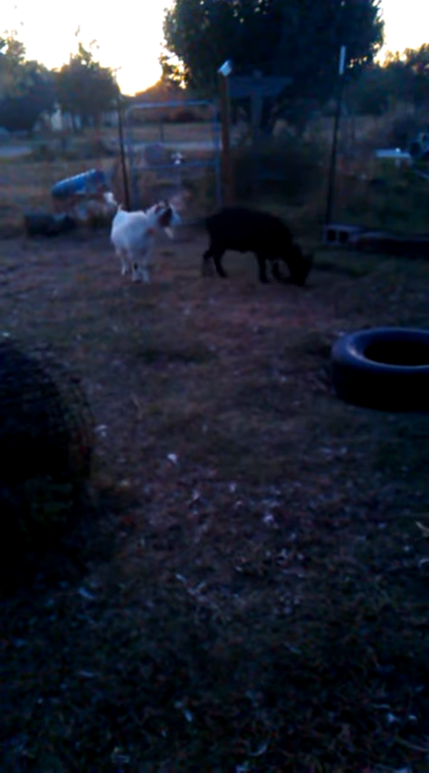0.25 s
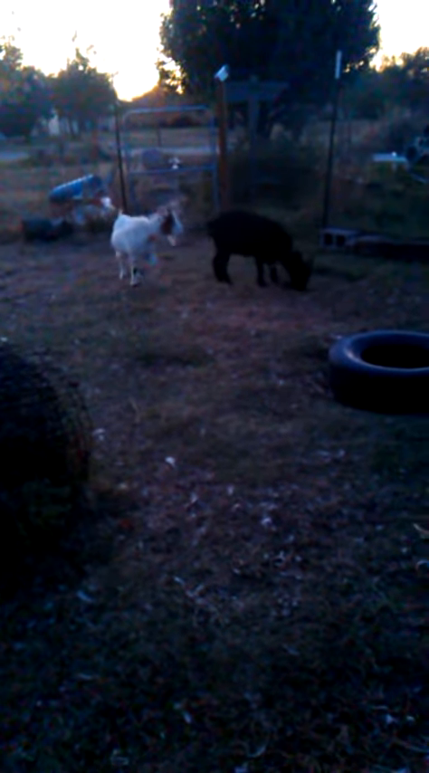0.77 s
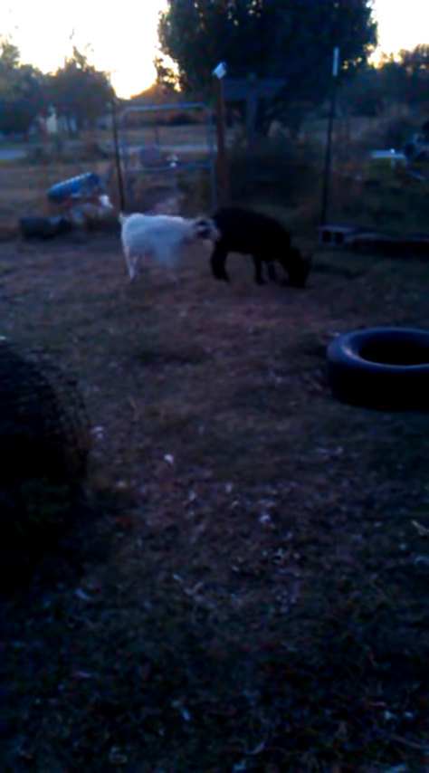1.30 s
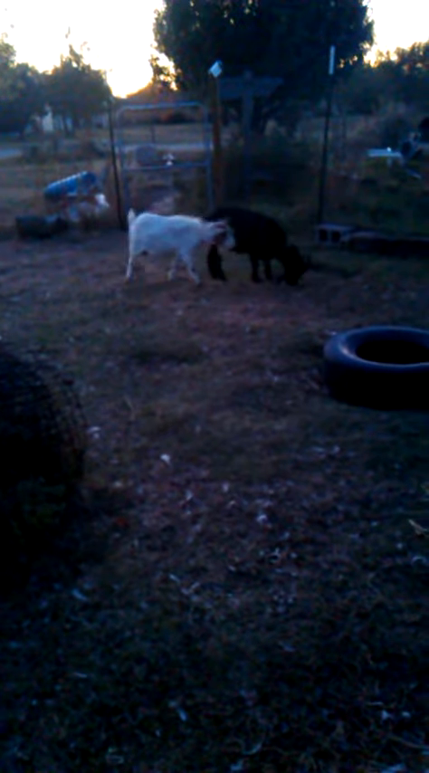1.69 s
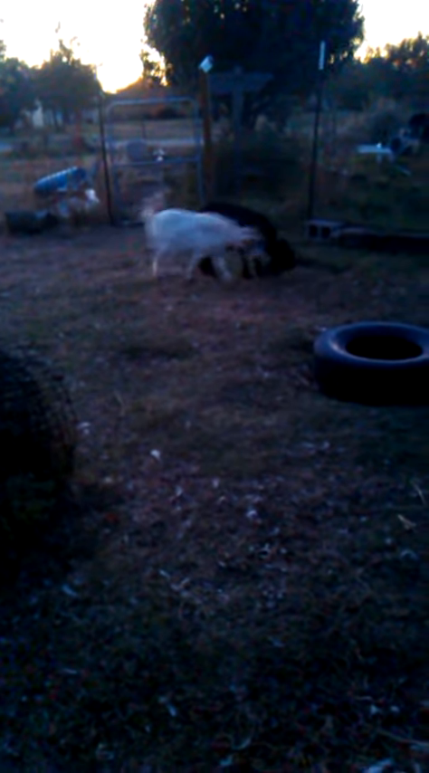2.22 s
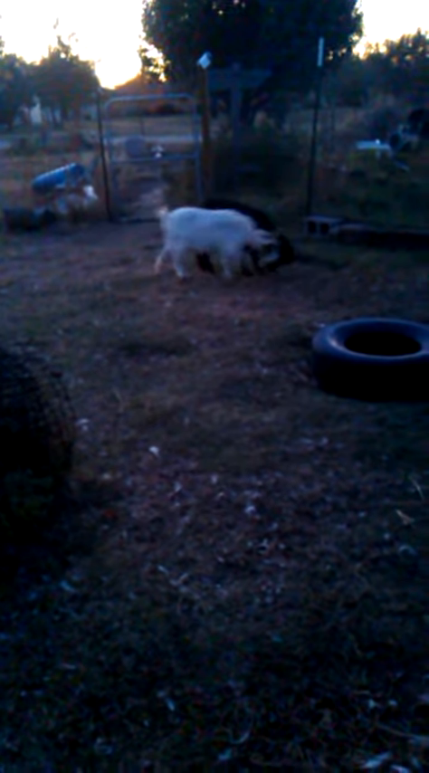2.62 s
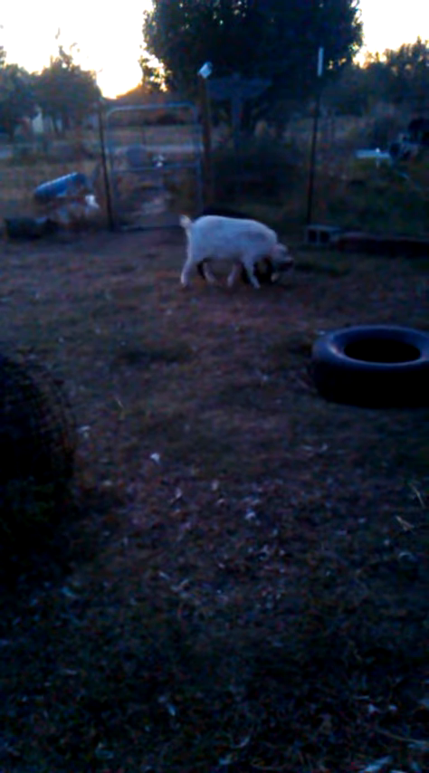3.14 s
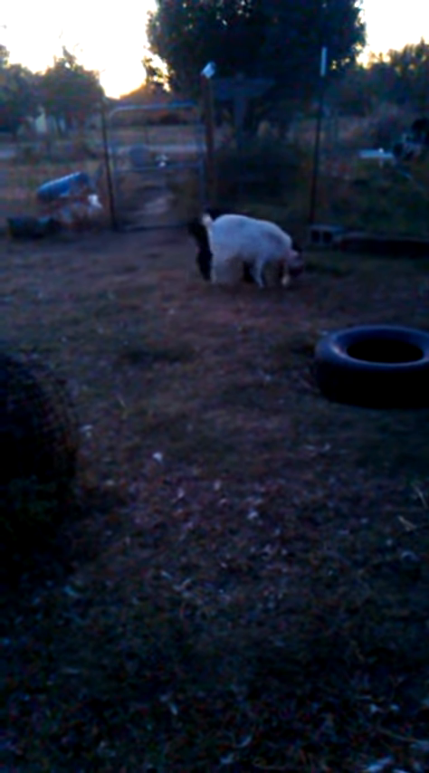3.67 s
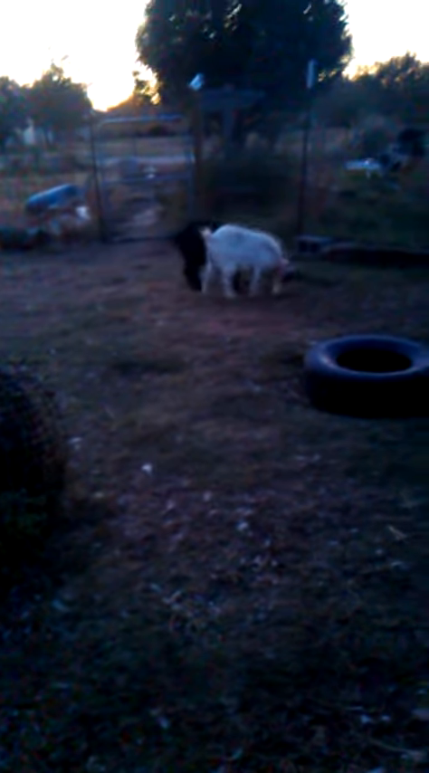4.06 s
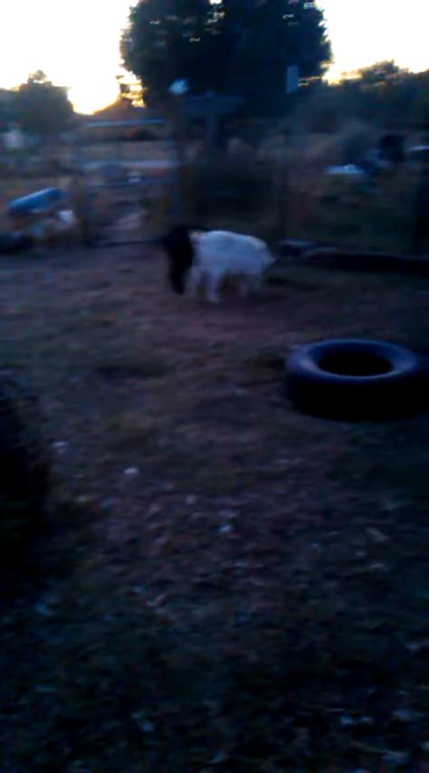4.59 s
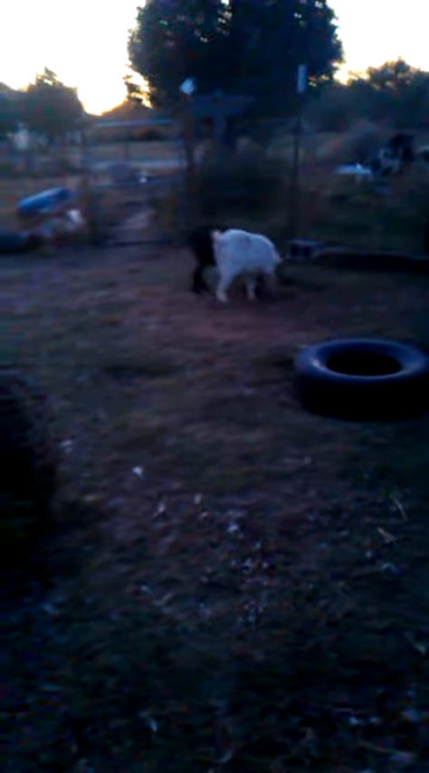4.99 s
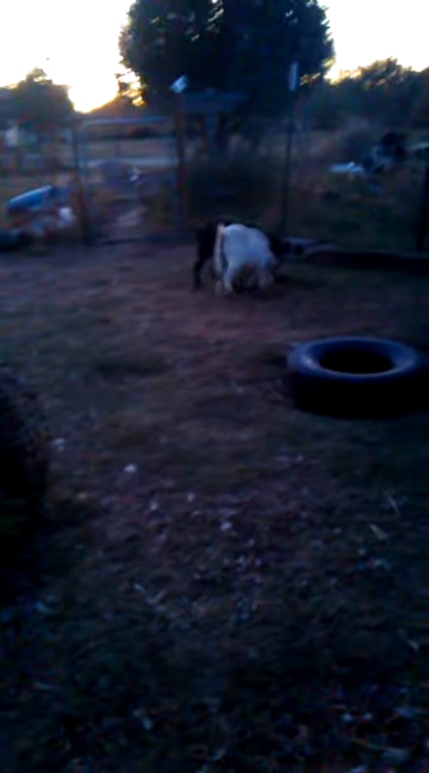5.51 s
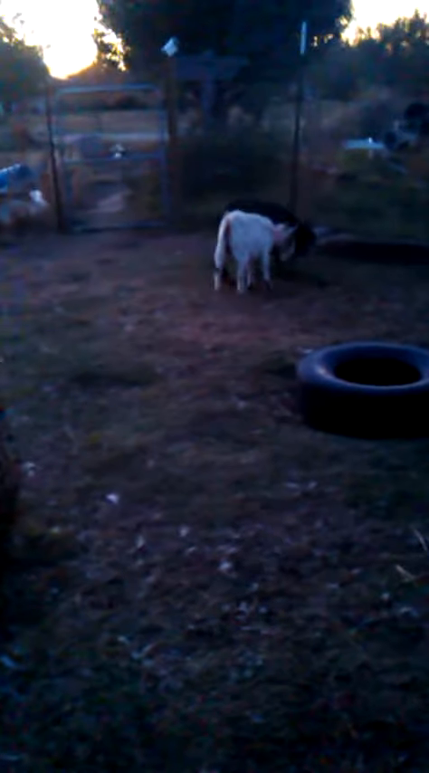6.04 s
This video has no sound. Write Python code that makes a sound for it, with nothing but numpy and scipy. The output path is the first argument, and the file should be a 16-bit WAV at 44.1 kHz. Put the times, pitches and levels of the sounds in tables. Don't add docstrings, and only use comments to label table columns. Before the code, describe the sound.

A hushed outdoor bed of wavering low hum and thin grass hiss carries muffled, far-off fowl clucks, dry clicks and an occasional tiny bird chip. Midway a goat breaks in with short, raspy, nasal bleats that crack and go hoarse, ending on a clean cry cut off abruptly. Its ringing fades across the open yard; afterwards there is a sharp tick, hoof thuds, rustled leaves and more low clucking, heard by a handheld microphone.

```python
import sys
import numpy as np
from scipy import signal
from scipy.io import wavfile
from scipy.ndimage import uniform_filter1d

SR = 44100
rng = np.random.default_rng(int(sys.argv[2]) if len(sys.argv) > 2 else 0)


def put_to_file(sound):
    columns = np.atleast_2d(sound).T
    safe = np.clip(columns, -1, 1)
    whole_steps = np.round(safe * 32767)
    wavfile.write(sys.argv[1], SR, whole_steps.astype(np.int16))


def to_linear_factor(level_db):
    exponent = np.asarray(level_db, float) / 20
    return 10 ** exponent


N = 277389

# time in seconds, level in
# dB.
HUM_SWELL = [(0, -59), (.4, -68), (.56, -57), (.9, -51), (1.5, -58), (1.9, -66), (2.55, -63.5),
             (2.75, -57.5), (3.8, -59.5), (4.0, -70.5), (4.3, -76), (4.6, -61.5), (5.4, -60), (5.7, -59),
             (5.9, -63), (6.29, -57.5)]
# starting level in dB, drift in dB per second, share of the swell.
HUM_PARTIALS = [(-16, 2.5, 0.53), (-1, 0, 0.81), (-12.5, 1.5, 0.81)]
# frequency in Hz, level in dB.
RUMBLE = [(27, -69.5), (50, -75)]
# frequency in Hz, density in dB per Hz.
AIR_COLOUR = [(12, -37), (20, -6), (93, -23), (226, -14.5), (283, -9.5), (363, -17), (418, -19),
              (467, -14.5), (1880, -32), (2780, -32.5), (5280, -31.5), (7800, -36), (15700, -36)]
# frequency in Hz, density in dB per Hz.
GRASS_COLOUR = [(500, -1), (1200, -1), (2300, -7), (3500, -18), (4600, 0), (5500, 3.5), (6500, -3.5),
                (8000, -21), (12000, -37)]
# centre in seconds, level in dB, width in seconds.
GUSTS = [(0, -57.5, 0.036), (.15, -62.5, 0.2), (1.46, -54, 0.093), (2.3, -65.5, 0.21), (4.7, -62.5, 0.11),
         (5.774, -57, 0.13), (6.29, -61, 0.11)]

# start in seconds, level in dB, start pitch in Hz, top pitch in Hz.
CHIPS = [
    (1.109, -45.5, 5110, 6010),
    (2.727, -45.5, 5150, 6000),
    (5.219, -42.5, 4960, 6140),
]
# start in seconds, level in dB, length in seconds, cavity pitch factor.
OPEN_CLUCKS = [(0.16, -49, 0.073, 0.94), (0.505, -50.5, 0.19, 0.87), (0.559, -48, 0.042, 1.01),
               (0.956, -46.5, 0.082, 0.95), (1.154, -46.5, 0.087, 0.95), (1.566, -45.5, 0.077, 0.98),
               (1.812, -46, 0.092, 0.99), (2.347, -50.5, 0.091, 0.99), (2.728, -52.5, 0.13, 0.92),
               (2.163, -56.5, 0.034, 0.91), (5.58, -52, 0.078, 0.9)]
# start in seconds, level in dB, length in seconds, cavity pitch factor.
MUTTERS = [(0.25, -54, 0.058, 0.67), (0.682, -51, 0.036, 0.87), (.745, -53, 0.071, 1),
           (1.266, -49, 0.049, 0.73), (1.431, -46, 0.058, 1.28), (2.086, -48.5, .058, 0.93),
           (2.802, -50.5, 0.1, 0.94), (4.7447, -51, 0.059, 1.2), (4.95, -44, 0.11, 1.03),
           (5.223, -49.5, 0.091, 0.89), (5.2925, -46.5, 0.093, 0.89), (5.684, -57, 0.078, 1.15),
           (5.938, -45.5, 0.13, 0.966), (6.019, -46, 0.082, 0.87), (6.12, -44, 0.47, 0.97),
           (6.2527, -61, 0.085, 0.97), (6.0144, -51, 0.023, 1.8), (6.205, -42.5, 0.06, 1.64)]
# upper rings in dB, brightness in dB, air between knocks as a ratio.
OPEN_BEAK = (5.1, -6, 1.1)
SHUT_BEAK = (-5.5, -12.5, 0.54)
# frequency in Hz, width in Hz, level in dB.
CLUCK_RINGS = [(1282, 250, 11.5), (1545, 71, 14.5), (1946, 165, 1), (2453, 106, -10.5)]

# start in seconds, level in dB, ring in Hz, t60 in seconds.
TICKS = [(0.19, -41.5, 5400, 0.0066), (0.9462, -51, 4020, 0.0043), (1.141, -46, 5900, 0.004),
         (1.1534, -47, 5900, 0.004), (1.7624, -52, 3260, 0.0052), (2.0403, -53, 4100, 0.0072),
         (2.3846, -39, 4450, 0.013), (2.587, -42.5, 5390, 0.0025), (2.712, -52, 3400, .004),
         (2.8584, -46, 3080, 0.005), (2.859, -50, 4100, .004), (2.9317, -38, 6200, 0.00195),
         (4.6844, -41, 4960, 0.008), (4.695, -50, 4500, .006), (1.788, -50, 5000, .004),
         (4.7156, -41, 3845, 0.0044), (5.1178, -30.5, 5500, 0.0034), (5.467, -48, 5320, 0.00335),
         (5.977, -51, 4900, 0.0054), (6.0482, -51, 5490, 0.012)]
# start in seconds, level in dB, ring in Hz, t60 in seconds.
THUDS = [
    (2.859, -51, 278, 0.064),
    (3.669, -41.5, 260, 0.038),
    (4.38, -50, 155, 0.087),
    (5.128, -44, 272, 0.14),
    (0.031, -55, 792, 0.2),
    (5.062, -47.5, 604, 0.049),
]
# start in seconds, level in dB, centre in Hz, width in Hz, t60 in seconds.
SCUFFS = [(0.89, -62, 5100, 2500, 0.1), (1.8364, -67, 4960, 2500, 0.32), (2.2, -54.5, 4200, 1900, 0.25),
          (4.955, -56.5, 1800, 1500, .3), (4.9675, -53.5, 4100, 2900, 0.29),
          (6.1705, -53.5, 5500, 2450, 0.33), (6.174, -56, 5200, 350, .15), (6.05, -60, 5500, 500, .1),
          (4.68, -58, 5400, 2500, 0.11), (2.1, -57, 2450, 150, .3)]

# time in seconds, effort in dB, mouth opening 0-1.
BLEATS = [
    [(2.985, -44, 0.5), (2.991, -35, 0.65), (3.007, -27.5, 0.7), (3.045, -22.5, 0.52), (3.055, -24, 0.6),
     (3.12, -24, 0.63), (3.189, -34.5, 0.81), (3.21, -50, 0.06)],
    [(3.286, -33, 0.38), (3.312, -22.5, 0.3), (3.352, -24.5, 0.3), (3.364, -21.5, 0.52), (3.39, -25, 0.37),
     (3.41, -33.5, 0.1), (3.44, -40.5, 0), (3.455, -49, 0)],
    [(3.455, -42.5, 0.5), (3.489, -22.5, 0.7), (3.541, -22, 0.75), (3.67, -23, 0.56), (3.791, -27, 0.7),
     (3.83, -41.5, 0.82)],
    [(3.974, -38, 0.57), (3.982, -34.5, 0.84), (4.022, -26.5, 0.65), (4.1, -25.5, 0.5), (4.19, -26, 0.64),
     (4.29, -30.5, 0.53)],
]
# time in seconds, pitch in Hz, roughness 0-1.
FOLDS = [
    [(2.985, 468, .2), (3.006, 514, .1), (3.02, 530, .08), (3.04, 552, .12), (3.05, 580, .76),
     (3.108, 598, .76), (3.124, 540, .6), (3.134, 531, .08), (3.168, 516, .12), (3.182, 512, .7),
     (3.22, 520, .5)],
    [(3.285, 545, .8), (3.302, 650, .7), (3.311, 688, .13), (3.321, 702, .14), (3.33, 740, .18),
     (3.35, 752, .24), (3.359, 712, .1), (3.378, 698, .1), (3.388, 675, .35), (3.394, 705, .85),
     (3.415, 708, .3), (3.44, 745, .4), (3.455, 735, .6)],
    [(3.455, 710, .65), (3.47, 690, .8), (3.5, 668, .7), (3.7, 668, .66), (3.84, 655, .75)],
    [(3.97, 565, .8), (4.025, 590, .72), (4.05, 592, .65), (4.11, 584, .65), (4.165, 600, .68),
     (4.19, 650, .7), (4.29, 647, .55)],
]
# frequency in Hz, width in Hz, level in dB.
HALF_OPEN_THROAT = [(634, 660, 0), (970, 174, -2.5), (1370, 122, 10), (2070, 250, -19), (2994, 235, -14),
                    (4140, 205, -6), (4634, 330, 1), (5500, 410, -11.5), (6270, 270, -6.5),
                    (8650, 400, -35), (9730, 230, -24), (11130, 400, -38.5), (13050, 530, -39)]
WIDE_OPEN_THROAT = [(530, 280, -10), (1016, 130, 1), (1380, 360, 1), (1890, 180, -9.5), (2800, 300, -17.5),
                    (4260, 740, -9.5), (4730, 320, 2), (5560, 620, 7), (6200, 120, -10), (7700, 750, -22),
                    (10400, 1020, -42), (10580, 140, -21)]
HOARSE_THROAT = [(660, 1300, -8), (995, 130, -0.5), (1335, 168, 0.5), (1793, 337, -10), (2860, 150, -14),
                 (3204, 130, -17), (4190, 730, -13), (4880, 330, -1), (5650, 450, 4.5), (6200, 300, -12),
                 (6850, 160, -50), (8340, 504, -27), (8830, 350, -27), (10920, 660, -33)]
STRAINED_THROAT = [(500, 370, -23), (1004, 235, -2.5), (1317, 118, 4), (1730, 265, -9.5), (2715, 260, -21),
                   (3950, 380, -5.5), (4610, 350, -2.5), (5590, 375, 1.5), (6420, 150, -13),
                   (8070, 560, -24.5), (9880, 330, -25.5), (10934, 450, -32)]
# frequency in Hz, width in Hz, opening 0-1.
POCKETS = [(3530, 560, 0.94), (3630, 240, 0.8), (3800, 190, .8), (3500, 400, 0.9)]
SPLITS_HZ = [0, 0, 55, 0]
LIPS_DB = [17, 1.8, 1.1, 1]
NOSES_DB = [2.5, -4, -0.5, 1.3]
# time in seconds, dip in dB.
CATCHES = [(3.06, -11), (3.08, -15), (3.115, -21), (3.318, -17), (3.383, -14), (3.4, -8), (3.447, -15),
           (4.194, -8)]
HANDOVER_S = (4.222, 4.266)
# time in seconds, pitch in Hz, level in dB, mouth opening 0-1.
CRY = [(4.22, 637, -25.5, 1), (4.278, 643.8, -27.5, 0.88), (4.38, 638.4, -26.5, 0.76),
       (4.464, 629, -28.5, 0.92), (4.5, 627.4, -26, 0.65), (4.565, 619.7, -28, 0.24),
       (4.588, 608, -25.5, 0.04), (4.596, 580, -26.5, 0.02), (4.607, 475, -41, 0)]
# multiple of the pitch, level in dB, drift in dB per second.
CRY_PARTIALS = [(1, -6, 0), (2, 0, 0), (3, -28, -20), (4, -34, -50), (5, -37, 12), (6, -15, 25),
                (7, -9, -20), (8, -16, -20), (9, -21, -10), (10, -11, -15), (11, -29, -50), (12, -36, 40),
                (13, -41, 20), (14, -42, 20), (15, -33, -55), (16, -37, 40), (17, -35, -40), (18, -47, 50),
                (19, -46, 90)]

# frequency in Hz, t60 in seconds.
YARD_T60 = [(400, 0.29), (650, 0.64), (1250, 0.86), (2500, 0.85), (4000, 0.54), (8000, 0.058)]
# delay in seconds, level in dB.
ECHOES = [(.004, -20), (.021, -16), (.058, -23), (.095, -20), (.16, -58), (.235, -51), (.3, -36.5)]
# frequency in Hz, threshold in dB.
DROPOUT = [(1500, -72), (2200, -57), (3000, -55.5), (3600, -54), (4500, -68), (8000, -66), (11000, -62),
           (14000, -60)]


def evened(x):
    return x / np.sqrt(np.mean(x ** 2) + 1e-20)


def steadied(x, span_s=0.1):
    return x / np.sqrt(abs(uniform_filter1d(x ** 2, int(span_s * SR))) + 1e-12)


def read(points, hz):
    f, value = np.transpose(points)
    return np.interp(np.log(hz + 1), np.log(f + 1), value)


def unroll(rows):
    s, *columns = np.transpose(rows)
    t = np.arange(s[0], s[-1], 1 / SR)
    return t, [np.interp(t, s, c) for c in columns]


def add(mix, start_s, sound):
    part = mix[round(start_s * SR):][:len(sound)]
    part += sound[:len(part)]


def resonate(x, hz, width_hz):
    turn = np.exp(2j * np.pi * hz * np.arange(len(x)) / SR)
    r = np.exp(-np.pi * abs(width_hz) / SR)
    return 2 * (turn * signal.lfilter([1 - r], [1, -r], x / turn)).real


def resonate_twice(x, hz, width_hz):
    return resonate(resonate(x, hz, width_hz), hz, width_hz)


def wobble(length, hz):
    low_pass = signal.butter(2, hz, fs=SR, output="sos")
    return evened(signal.sosfilt(low_pass, rng.standard_normal(length)))


def hiss(colour, patchy_db):
    hz = np.fft.rfftfreq(1024, 1 / SR)
    a, b, patches = rng.standard_normal((N // 256 + 5, 513, 3)).T
    patches = uniform_filter1d(patches, size=12, axis=0)
    patches = evened(uniform_filter1d(patches, size=10, axis=1))
    spectrum = (a + 1j * b) * to_linear_factor(read(colour, hz)[:, None] + patchy_db * patches)
    return evened(signal.istft(spectrum, nperseg=1024, noverlap=768)[1][:N])


def air():
    return to_linear_factor(-60) * hiss(AIR_COLOUR, patchy_db=.4)


def hum():
    t, (swell_db,) = unroll(HUM_SWELL)
    hz = 142.1 - .8 * t
    turns = np.cumsum(hz * (1 + 0.0037 * wobble(len(t), hz=5.3))) / SR
    tone = np.zeros(len(t))
    for k, (start_db, db_per_s, share) in enumerate(HUM_PARTIALS, 1):
        level_db = share * (swell_db + 59.5) - 60.5 + start_db + db_per_s * t
        tone += to_linear_factor(level_db + 2.2 * wobble(len(t), hz=1.9)) * np.sin(2 * np.pi * k * turns)
    for f, db in RUMBLE:
        level = to_linear_factor(db + wobble(len(t), hz=3))
        tone += level * np.sin(2 * np.pi * f * t + wobble(len(t), hz=0.52))
    return np.sqrt(2) * np.resize(tone, N)


def gusts():
    t = np.arange(N) / SR
    power = to_linear_factor(2 * -72.5)
    for s, db, width_s in GUSTS:
        power = power + to_linear_factor(2 * db) * np.exp(-((t - s) / width_s) ** 2)
    return np.sqrt(power)


def grass():
    return gusts() * hiss(GRASS_COLOUR, patchy_db=.8)


def cluck(db, length_s, size, upper_db, bright_db, air_ratio):
    t = np.arange(0, np.clip(length_s, .02, .2) + 0.07, 1 / SR)
    turns = np.cumsum(68 * (1 + .25 * wobble(len(t), hz=60))) / SR
    knocks = np.diff(np.floor(turns), prepend=-1) > 0
    puff = signal.lfilter([1], [1, -.993], knocks * 1.) * rng.standard_normal(len(t))
    drive = evened(puff) + air_ratio * rng.standard_normal(len(t))
    drive = drive * np.sin(np.pi * np.minimum(t / length_s, 1) ** 0.68)
    rings = []
    for f, width_hz, ring_db in CLUCK_RINGS:
        once = resonate(drive, f * size, width_hz)
        rings.append(to_linear_factor(ring_db) * resonate(once, f * size, 1.47 * width_hz))
    lower, upper = evened(sum(rings[:2])), evened(sum(rings[2:]))
    edge = evened(resonate_twice(drive, 4650, 2000))
    return to_linear_factor(db - 17) * (lower + to_linear_factor(upper_db) * upper + to_linear_factor(bright_db) * edge)


def chip(db, start_hz, top_hz):
    t = np.arange(0, .07, 1 / SR)
    burr = 1 + 0.014 * wobble(len(t), hz=300)
    low_hz = .9 * top_hz - (.9 * top_hz - .96 * start_hz) * np.exp(-t / .006)
    high_hz = .985 * top_hz * (1 + .05 * np.exp(-((t - .025) / .004) ** 2))
    low, high = (np.sin(2 * np.pi * np.cumsum(hz * burr) / SR) for hz in (low_hz, high_hz))
    low = to_linear_factor(-360 * abs(t - .012)) * low
    high = np.clip(t / 0.0081 - .4, 0, .7) * to_linear_factor(-280 * abs(t - .025)) * high
    level = to_linear_factor(db - 0.5 + 3.0 * wobble(len(t), hz=252))
    return level * (low + high) * signal.windows.tukey(len(t), .12)


def knock(db, hz, t60_s):
    t = np.arange(0, .12, 1 / SR)
    glide = 1 - 8 * t * (hz > 2000)
    return to_linear_factor(db - 60 * t / abs(t60_s)) * np.sin(2 * np.pi * hz * t * glide)


def scuff(db, hz, width_hz, t60_s):
    t = np.arange(0, .12, 1 / SR)
    crumbs = to_linear_factor(1.3 * wobble(len(t), hz=200)) * rng.standard_normal(len(t))
    return to_linear_factor(db - 60 * t / t60_s) * evened(resonate_twice(crumbs, hz, width_hz))


def yard(x):
    taps = np.zeros(SR)
    at = np.arange(900, SR - 20, 20)
    taps[at + rng.integers(0, 20, len(at))] = rng.choice([-1., 1.], len(at))
    hz, t, z = signal.stft(taps, SR, nperseg=256)
    tail = signal.istft(z * to_linear_factor(-60 * t / read(YARD_T60, hz)[:, None]), SR, nperseg=256)[1]
    tail *= to_linear_factor(-19.5) / np.linalg.norm(tail)
    for s, db in ECHOES:
        spread, dull = round(s * .12 * SR) + 1, round(s * 32) + 1
        scatter = rng.choice([-1., 1.], spread) / np.sqrt(spread)
        add(tail, s, to_linear_factor(db) * np.convolve(scatter, np.ones(dull) / dull))
    return x + signal.fftconvolve(x, tail)[:N]


def fold_swing(t, folds, split_hz):
    s, hz, rough = np.transpose(folds)
    hz, rough = np.interp(t, s, hz), np.interp(t, s, rough)
    stumble = 0.098 * rough * wobble(len(t), hz=157.0)
    turns = np.cumsum(hz * (1 + stumble)) / SR
    lowest = np.cos(2 * np.pi * np.cumsum(hz * (1 + .6 * stumble)) / SR)
    split_turns = np.cumsum(split_hz * (1 + .5 * wobble(len(t), hz=40))) / SR
    lowest = evened(lowest * np.cos(2 * np.pi * split_turns))
    pulses = evened(sum(np.cos(2 * np.pi * k * turns) for k in range(1, 27)))
    puffs = evened((1.0 + np.exp(-(turns % 1) / 0.65)) * rng.standard_normal(len(t)))
    return lowest, pulses, puffs, rough


def bleat(rows, folds, pocket, throat, split_hz, lips_db, nose_db):
    t, (effort_db, mouth) = unroll(rows)
    since_s = t - t[0]
    catch_db = sum(db * np.exp(-((t - s) / 0.0028) ** 2) for s, db in CATCHES)
    nasal_db = nose_db + catch_db - 1.5 - 22 * (mouth - .5)
    rasp_db = 1 + 14 * (mouth - .5)
    lowest, pulses, puffs, rough = fold_swing(t, folds, split_hz)

    flutter = to_linear_factor(4.4 * rough * np.tanh(1.5 * wobble(len(t), hz=95)))
    flutter *= to_linear_factor(4 * rough * (t < 3.13) * np.cos(2 * np.pi * 45 * (t - 3.055)))
    slack = evened(resonate(rng.standard_normal(len(t)), 140, 90))
    rattle = to_linear_factor(4 * rough ** 2 * np.tanh(slack))

    lips_flare_db = lips_db * np.exp(-(since_s / 0.072) ** 2)
    groups = np.zeros((3, len(t)))
    for k, (f, width_hz, db) in enumerate(throat):
        group = (f > 800) + (f > 3500)
        airy = np.minimum(rough * [.7, 1.08, .75][group] + [0, .03, .14][group], 1)
        swing = pulses if group else lowest
        drive = flutter * (np.sqrt(1 - airy ** 2) * swing + airy * puffs)
        if group == 2:
            drive = drive * rattle
        level = to_linear_factor(db + lips_flare_db * (group == 1 and f > 1900))
        groups[group] += (-1) ** k * level * resonate_twice(drive, f, 1.25 * width_hz)
    nasal, oral, rasp = (steadied(g) for g in groups)
    voice = to_linear_factor(nasal_db) * nasal + oral + to_linear_factor(rasp_db) * rasp
    voice = to_linear_factor(effort_db - 4.5) * voice * signal.windows.tukey(len(t), .01)
    voice = voice * np.sqrt(np.interp(t, HANDOVER_S, [1, 0]))
    voice = signal.sosfilt(signal.butter(4, 353, "high", fs=SR, output="sos"), voice)

    pocket_hz, pocket_width_hz, pocket_open = pocket
    opening = min(pocket_open, 1) * np.clip(.5 + since_s / .08, 0, 1)
    for _ in range(2):
        voice = voice - opening * resonate(voice, pocket_hz, pocket_width_hz)
    return t[0], voice


def cry_breath(length):
    leak = rng.standard_normal(length)
    breath = evened(sum(to_linear_factor(db) * resonate_twice(leak, f, w) for f, w, db in STRAINED_THROAT))
    breath = breath + to_linear_factor(-13.0) * evened(resonate_twice(leak, 9300, 2500))
    return breath - .6 * resonate(breath, 3000, 900)


def cry():
    t, (hz, level_db, mouth) = unroll(CRY)
    mouth = np.clip(mouth, 0, 1)
    snap_s = 4.586
    upper_db = -32 - 17 * (t - t[0])
    upper_db += 7.5 * np.exp(-((t - snap_s) / 0.02) ** 2) - 2000 * np.maximum(t - snap_s, 0)
    turns = np.cumsum(hz * (1 + 0.0022 * wobble(len(t), hz=39.6))) / SR
    closing_s = np.maximum(t - 4.55, 0)

    upper = np.zeros(len(t))
    for k, db, db_per_s in CRY_PARTIALS[5:]:
        partial_db = db + db_per_s * (t - 4.5) - 83 * closing_s * (k - 6.0)
        upper += to_linear_factor(partial_db + 1.1 * wobble(len(t), hz=16.0)) * np.sin(2 * np.pi * k * turns)
    weak = np.zeros(len(t))
    for k, db, db_per_s in CRY_PARTIALS[2:5]:
        weak += to_linear_factor(db - 29.5 + db_per_s * (t - 4.5)) * np.sin(2 * np.pi * k * turns)
    tone = np.sqrt(1 - mouth) * np.sin(2 * np.pi * turns) + np.sqrt(mouth) * np.sin(4 * np.pi * turns)
    tone = np.sqrt(2) * to_linear_factor(level_db) * tone
    breath = to_linear_factor(-46 - 24 * (t - t[0])) * cry_breath(len(t))
    voice = tone + weak + to_linear_factor(upper_db) * steadied(upper) + breath
    fade_in = np.sqrt(np.interp(t, HANDOVER_S, [0, 1]))
    return t[0], voice * signal.windows.tukey(len(t), .02) * fade_in


def scene():
    far, near = np.zeros(N), np.zeros(N)
    clucks = [c + OPEN_BEAK for c in OPEN_CLUCKS] + [c + SHUT_BEAK for c in MUTTERS]
    layers = [(clucks, cluck, far), (CHIPS, chip, far), (TICKS + THUDS, knock, near), (SCUFFS, scuff, near)]
    for events, source, mix in layers:
        for start_s, *how in events:
            add(mix, start_s, source(*how))
    throats = [HALF_OPEN_THROAT, WIDE_OPEN_THROAT, HOARSE_THROAT, STRAINED_THROAT]
    for call in zip(BLEATS, FOLDS, POCKETS, throats, SPLITS_HZ, LIPS_DB, NOSES_DB):
        add(far, *bleat(*call))
    add(far, *cry())
    return (yard(far) + near + hum() + grass() + air())[None]


def drop_masked_bands(x):
    hz, _, z = signal.stft(x, SR, nperseg=1024, noverlap=768)
    power = abs(z) ** 2
    band_power = uniform_filter1d(uniform_filter1d(power, size=10, axis=1), size=5, axis=2)
    band_db = 10 * np.log10(abs(band_power) + 1e-20)
    total_db = 10 * np.log10(uniform_filter1d(power.sum(axis=1, keepdims=True), size=5, axis=2) + 1e-20)
    bins, frames = np.arange(z.shape[1]), np.arange(z.shape[2])
    high = bins >= 160
    wide = np.minimum(bins // 16 * 16 + 8, bins[-1])
    band_db = band_db[:, np.where(high, wide, bins)][:, :, frames // 4 * 4]
    luck_db = 2.5 * rng.standard_normal((len(frames) // 8 + 1, len(bins) // 16 + 1))
    luck_db = luck_db[frames // 8][:, bins // 16].T
    recovery_db = frames * 0.52
    held_db = np.maximum.accumulate(total_db + recovery_db, axis=2) - recovery_db
    margin_db = band_db + luck_db * high[:, None] - held_db - read(DROPOUT, hz)[:, None]
    return signal.istft(z * np.clip(margin_db, 0, 1), nperseg=1024, noverlap=768)[1][:, :N]


def roll_off(x):
    return signal.sosfilt(signal.butter(12, 15810, fs=SR, output="sos"), x)


def record(dry):
    rounded = .5 * np.tanh(dry / .5)
    limited = signal.oaconvolve(rounded, signal.firwin(511, 15720, fs=SR)[None], "same")
    return roll_off(drop_masked_bands(limited) - .0013)


dry = scene()
out = record(dry)
put_to_file(out)
```